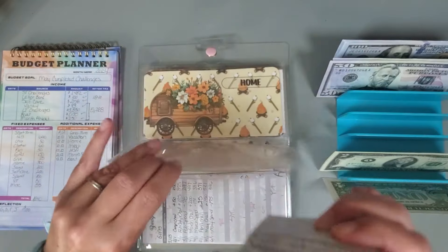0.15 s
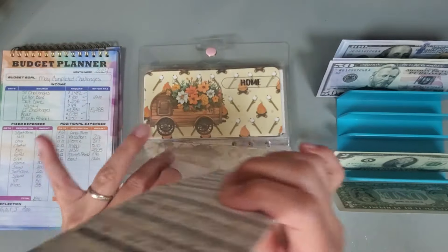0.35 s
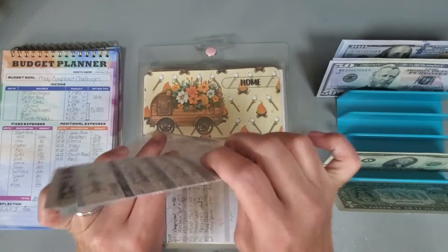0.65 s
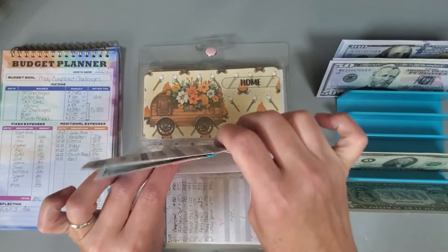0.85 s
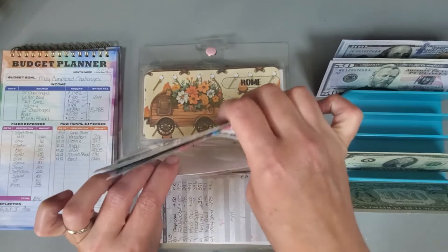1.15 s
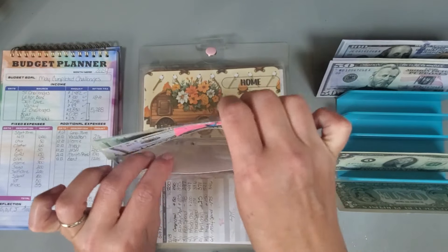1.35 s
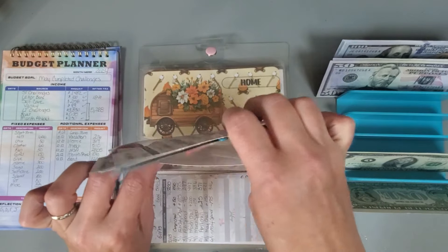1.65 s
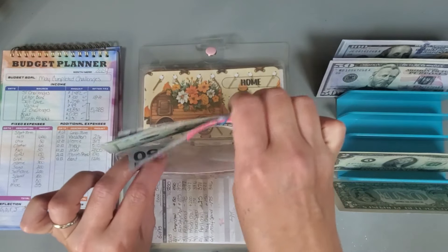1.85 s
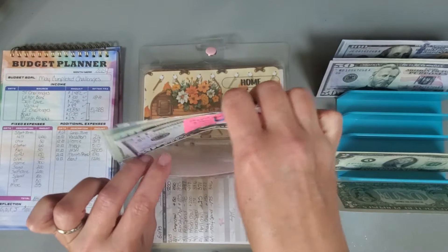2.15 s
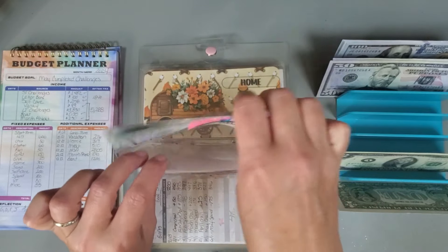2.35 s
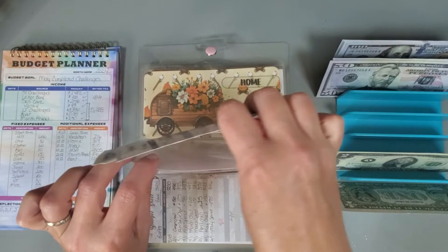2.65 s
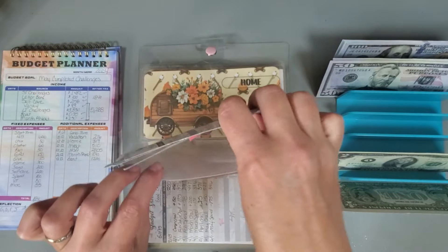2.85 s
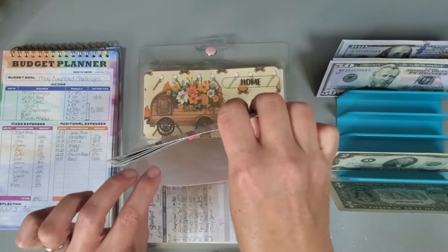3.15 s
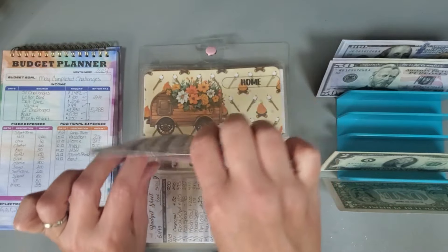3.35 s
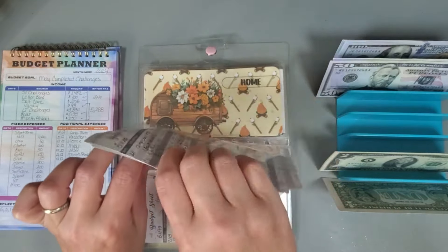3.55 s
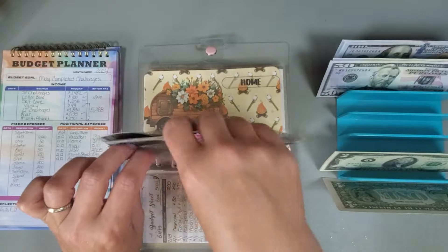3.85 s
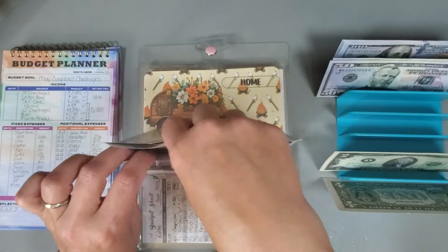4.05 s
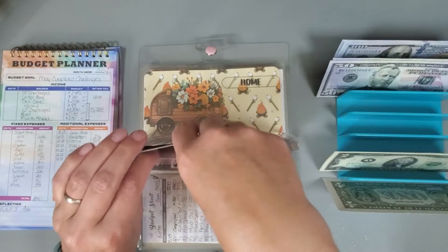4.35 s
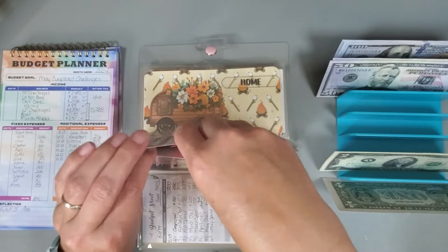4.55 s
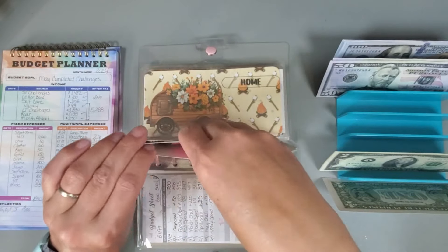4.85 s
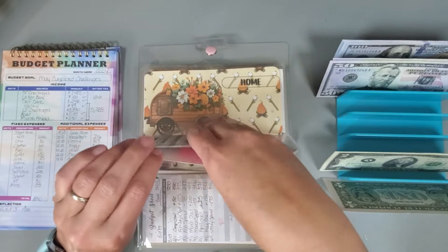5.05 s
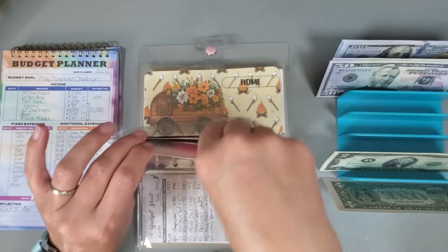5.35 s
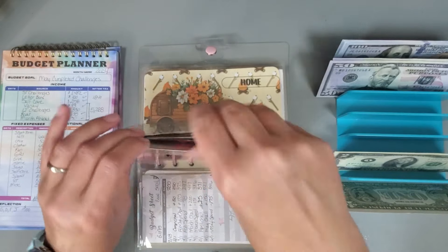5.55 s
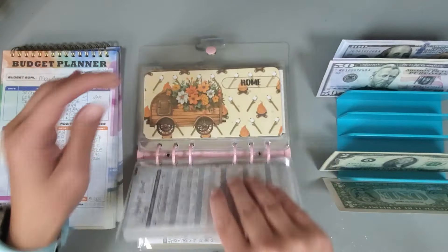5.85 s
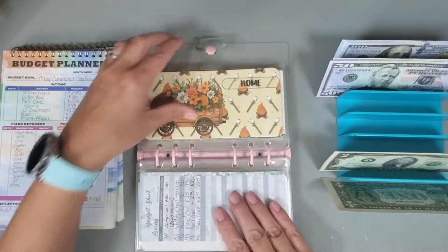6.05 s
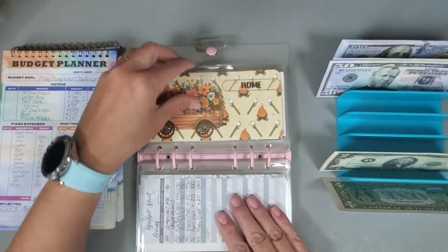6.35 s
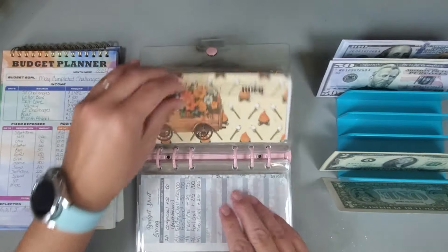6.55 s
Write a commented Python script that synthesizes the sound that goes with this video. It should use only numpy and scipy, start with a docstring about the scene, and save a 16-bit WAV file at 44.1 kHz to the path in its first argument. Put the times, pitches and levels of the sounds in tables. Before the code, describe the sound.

Paper money rubs against a plastic sleeve in short pushes, with crease snaps, thin ticks and dull knocks on a desk.

```python
"""In a quiet room, below a phone, hands start sliding a stack of banknotes into a plastic binder envelope.
Paper rubs on plastic in short pushes, creases snap, the film ticks and swishes, and knuckles bump the desk.
The sharpest snaps come near 1.8 s and 4 s; from then on the notes are inside and the rubbing loses a band
of treble. Near 5.8 s hand and binder thump the desk hardest, and a few last pushes follow. Throughout, the
hollow over the desk colours the paper's sound, the room adds a short tail and the house murmurs."""
import sys
import numpy as np
from scipy import signal
from scipy.fft import rfft, irfft, next_fast_len
from scipy.io import wavfile
from scipy.ndimage import uniform_filter1d

SR = 44100
rng = np.random.default_rng(int(sys.argv[2]) if len(sys.argv) > 2 else 0)


def store_wav(level_fs):
    """Save 16-bit WAV to argv[1]."""
    pcm = np.round(np.clip(np.atleast_2d(level_fs), -1, 1) * 32767)
    wavfile.write(sys.argv[1], SR, pcm.T.astype(np.int16))


N = 296307

STROKE_RANGE_DB = 20  # drop over one rise or fall time, before it is multiplied by the steepness
STEEPNESS = (1.69, 1.64, 1.02, 0.75)  # for hiss, fizz, scrape, weight
RESTING_DB = (-89, -84.5, -77, -92)  # the same four: resting fingers keep a faint rub going
# Pushes of paper over plastic: (peak time [s], rise [s], fall [s], hiss of the paper faces [dB],
# fizz of the edges [dB], scrape of the stack [dB], weight on the desk [dB])
PAPER_STROKES = [(0.0, .02, 0.17, -61.5, -70, -56, -53.5),
                 (0.132, 0.0079, 0.12, -49.5, -54.5, -47.5, -59.5),
                 (.22, 0.12, 0.27, -67.5, -81, -62, -63.5),
                 (0.369, 0.061, 0.069, -48.5, -58.5, -46.5, -52.5), (0.505, 0.14, 0.09, -67, -70, -53, -59),
                 (0.581, 0.097, 0.17, -49, -59, -47, -60), (0.938, 0.21, 0.11, -54.5, -65.5, -49.5, -49),
                 (1.066, 0.028, 0.094, -53, -62, -50.5, -46), (1.121, 0.036, 0.16, -46.5, -52, -45, -47.5),
                 (1.2, 0.18, 0.089, -48, -52, -52.5, -63), (1.295, 0.18, 0.11, -50, -52.5, -43, -47),
                 (1.36, 0.023, 0.2, -62, -86, -47.5, -53), (1.426, 0.019, 0.059, -55, -54.5, -48.5, -52),
                 (1.542, 0.061, 0.17, -54, -70, -46.5, -51), (1.71, 0.29, 0.71, -58, -67.5, -59, -59),
                 (1.781, 0.089, 0.087, -45.5, -53, -46.5, -55), (1.811, .005, 0.055, -34.5, -40, -46, -60),
                 (1.83, 0.043, 0.023, -35, -33, -41, -52), (1.85, .03, 0.049, -64, -53, -64, -49),
                 (1.909, 0.05, 0.26, -56.5, -64, -48, -45), (2.112, 0.12, 0.21, -49, -53.5, -41.5, -46.5),
                 (2.285, 0.03, 0.16, -44.5, -54.5, -38.5, -48), (2.43, 0.12, 0.15, -51, -55.5, -45.5, -54),
                 (2.525, 0.026, 0.075, -42, -45, -43, -47.5), (2.679, 0.01, 0.25, -54, -61, -49, -56),
                 (2.75, 0.14, 0.075, -53.5, -55, -47.5, -59), (2.94, 0.19, 0.36, -61, -72, -53.5, -53.5),
                 (3.197, 0.086, 0.12, -56.5, -63, -49.5, -58), (3.354, 0.088, 0.33, -48.5, -54, -47, -63),
                 (3.416, 0.03, 0.15, -44, -42.5, -49.5, -48.5),
                 (3.625, 0.057, 0.095, -45, -52.5, -44.5, -47),
                 (3.77, 0.32, 0.12, -43.5, -48.5, -46.5, -54), (3.54, 0.097, 0.15, -59, -58.5, -75, -67),
                 (3.85, 0.085, 0.2, -57, -72, -52, -49), (3.974, 0.012, 0.22, -45.5, -47.5, -39, -39),
                 (4.08, 0.28, 0.22, -50.5, -60, -65, -62), (4.179, 0.15, 0.22, -47.5, -58, -44.5, -44.5),
                 (4.32, 0.038, 0.052, -40.5, -40.5, -46, -49),
                 (4.454, 0.084, 0.12, -49.5, -54.5, -47.5, -54.5),
                 (4.569, 0.11, 0.094, -52.5, -63, -47.5, -53), (4.641, 0.096, 0.14, -54, -60.5, -52.5, -62),
                 (4.747, 0.11, 0.16, -47, -53, -46, -60), (4.961, 0.44, 0.28, -55, -63.5, -52, -53),
                 (5.15, 0.73, 1.7, -63, -80, -60, -71), (5.148, 0.093, 0.078, -52.5, -61.5, -48, -58),
                 (5.31, 0.17, 0.13, -50, -57, -44.5, -55), (5.424, 0.06, 0.19, -48.5, -55.5, -49.5, -50.5),
                 (5.65, 0.52, 0.2, -55, -70, -46.5, -47.5), (5.835, 0.12, 0.092, -48, -58, -45.5, -42.5),
                 (5.89, 0.0099, 0.043, -48, -53, -64, -40.5), (6.03, 0.22, 0.12, -59.5, -68, -54.5, -45.5),
                 (6.27, 0.1, 0.067, -57.5, -69, -59.5, -51), (6.12, 0.034, 0.33, -64, -76, -59, -54.5),
                 (6.471, 0.016, 0.1, -57, -67, -55.5, -80), (6.55, 0.04, 0.2, -53, -58, -51, -52),
                 (6.591, 0.066, 0.038, -53, -51, -64, -58), (6.71, 0.18, .1, -63.5, -69, -54.5, -69)]
def paper_strokes():
    """Each push swells and dies away; gives the strength of hiss, fizz, scrape and weight over time."""
    t = np.arange(0, N + 64, 64) / SR
    power = undb(2 * np.array(RESTING_DB))[:, None]
    for peak_s, rise_s, fall_s, *peak_db in PAPER_STROKES:
        away = np.maximum((peak_s - t) / rise_s, (t - peak_s) / fall_s)
        drop_db = np.outer(STEEPNESS, STROKE_RANGE_DB * away)
        power = power + undb(2 * (np.array(peak_db)[:, None] - drop_db))
    return [np.interp(np.arange(N) / SR, t, np.sqrt(p)) for p in power]


WAVER_DB, FLICKER_DB = 1.0, 1.6  # slow and fast wobble of each ringing pitch
CRINKLES_PER_S, CRINKLE_GAIN_DB = 120, 16  # small creases popping as the sheets rub
SHEEN_DB, SHEEN_PER_FIZZ = -78, 0.84  # the film's whisper at a fizz of -60 dB; dB gained per dB of fizz
# Pitches at which the envelope and the hollow over the desk ring: (pitch [Hz], width [Hz], level [dB])
HOLLOW_TONES = [(443, 53, 10), (643, 79, 11.5), (974, 109, 9), (1515, 440, -0.5), (1753, 500, 5),
                (2250, 770, 1.5), (3123, 460, 7.5), (3560, 360, 9), (3970, 620, 9), (5400, 1140, 4.5),
                (7830, 1770, -4.5), (10500, 21000, -35)]
# Pitches at which the desk top rings: (pitch [Hz], width [Hz], level [dB])
DESK_TONES = [(55, 37, 0), (90.7, 26, 3.5), (142.7, 25.6, 1), (244, 40, -3.5), (360, 83, -7.5)]
def paper_rubbing():
    """Paper sticks and slips on plastic in uneven patches, while the hand's weight shakes the desk."""
    hiss, fizz, scrape, weight = paper_strokes()
    patchy = undb(1.3 * wander(70) + 1.2 * wander(250))
    rub = 0
    for tone in HOLLOW_TONES:  # the sheets bend and shift, so each tone swells and fades by itself
        wobble = undb(WAVER_DB * wander(12) + FLICKER_DB * wander(45))
        rub = rub + wobble * ring_body(patchy * slips(N, spread_db=2.5), [tone])
    pops = (rng.random(N) < CRINKLES_PER_S / SR) * rng.standard_normal(N)
    rub = unit_level(rub) + undb(CRINKLE_GAIN_DB) * ring_body(pops, HOLLOW_TONES)
    sheen = undb(SHEEN_DB) * (fizz / undb(-60)) ** SHEEN_PER_FIZZ
    paper = scrape * unit_level(band(band(rub, 408, 1710), 404, 2140))
    paper += hiss * unit_level(band(band(rub, 2180, 6480), 1600, 6030))
    paper += fizz * unit_level(steep_band(rub, 4450, 11500))
    paper += sheen * unit_level(steep_band(rub, 10600, 19000))
    shaking = slips(N, spread_db=-0.5) * undb(2 * wander(30))
    return paper + weight * unit_level(ring_body(shaking, DESK_TONES))


INSIDE_FROM_S, DIP_DEPTH = 3.95, 0.62
def envelope_dip(rub):
    """Once the notes are inside the envelope, one band of the rubbing's treble gets weaker."""
    inside = np.clip((np.arange(N) / SR - INSIDE_FROM_S) / 0.1, 0, 1)
    return rub - DIP_DEPTH * inside * ring(rub, hz=6700, width_hz=880)


CRACK_MS, RISE_PER_FALL = 1.53, 0.16  # snaps under CRACK_MS are mostly one crack; short ones rise faster
# Creases buckling; bump, clack and crackle are relative to the tone's peak:
# (time [s], tone peak [dB], pitch [Hz], desk bump [dB], clack [dB], crackle [dB], fall [ms])
CREASE_SNAPS = [(0.124, -37, 630, -39, -11, -15, 4.2), (0.365, -45.5, 1610, -12, 2, -17, 2.6),
                (0.909, -36.5, 440, -15, -16, -15, 2.8), (1.073, -33, 397, -14, -18, -22, .5),
                (1.083, -36, 923, -28, -16, -22, 2.7), (1.123, -29, 960, -18, -13, -17, 2.8),
                (1.207, -37, 945, -10, -11, -26, 3.7), (1.221, -27, 930, -24, -40, -36, 2.4),
                (1.246, -30, 1480, -18, -21, -33, .6), (1.274, -26, 990, -37, -12, -33, 10.5),
                (1.283, -24.5, 960, -33, -9.5, -15.5, 2.1), (1.356, -38.5, 380, -25, -15, -28, 1.5),
                (1.529, -35, 1140, -26, -18.5, -29, 2.2), (1.757, -31, 780, -12, -24, -30, 1.2),
                (1.771, -31.5, 690, -25, -28, -28, 1.2), (1.809, -29, 646, -10.5, -23, -12, 0.44),
                (1.815, -22, 4080, -45, -33, -30, 0.31), (1.83, -18.5, 3500, -30, -29, -38, 2),
                (1.869, -48, 700, -20, -14, -22, 1.6), (1.888, -33.5, 504, -6.5, -19, -36, 1.7),
                (1.915, -31.5, 1680, -9, -34, -16, 2.7), (1.919, -29.5, 920, -39, -21, -17, 4.4),
                (2.015, -39, 470, -11, -15, -20, 3.9), (2.102, -32, 660, -16, -28, -28, 3.7),
                (2.118, -30.5, 990, -12.5, -14, -20, 5.1), (2.208, -31.5, 1800, -13, -13, -21, 1.6),
                (2.274, -33.5, 710, -13, -4.5, -14.5, 0.41), (2.433, -34, 1800, -26, -18, -28, 1),
                (2.499, -32.5, 960, -18, -12, -13.5, 8), (2.517, -25.5, 935, -13, -27, -17, 3.6),
                (2.53, -23, 500, -16, -14, -15.5, 2), (2.688, -31.5, 760, -40, -30, -34, 1.9),
                (2.737, -31.5, 690, -40, -13, -12.5, 0.86), (2.835, -26.5, 440, -16.5, -42, -61, 0.59),
                (2.951, -56.5, 1760, -15, 5.5, 1.5, 4.9), (3.364, -34, 980, -22, -23, -19, 1.7),
                (3.414, -35.5, 960, -26, -23, -11, 9.5), (3.614, -28.5, 880, -17.5, -11, -16.5, 3.4),
                (3.843, -36, 905, -11, -9.5, -8, 3.8), (3.9626, -15, 930, -19, -13.5, -15, 1),
                (3.964, -12.5, 644, -15, -15, -14, 2.2), (4.134, -31.5, 493, -6, -15, -37, 0.5),
                (4.165, -26.5, 707, -35, -24, -34, 0.61), (4.184, -32, 312, -7, -10, -27, 2.2),
                (4.305, -32.5, 570, -31, -39, -35, 18), (4.315, -24.5, 880, -17, -9.5, -22, 7.1),
                (4.556, -29, 710, -23, -16.5, -31, 2.5), (4.736, -28.5, 765, -11.5, -15, -30, 4.7),
                (4.84, -36, 680, -18, -47, -26, 5), (5.227, -35, 940, -35, -41, -28, 2.1),
                (5.289, -37, 643, -26, -16, -29, 5.2), (5.555, -37, 676, -12, -19, -32, 4.3),
                (5.6523, -30.5, 900, -14, -9.5, -16.5, 0.62), (5.659, -34, 1500, -19, -12, -25, 3.9),
                (5.741, -29, 800, -23, -20, -27, 0.45), (5.765, -29.5, 670, -28, -39, -45, 13),
                (5.778, -39, 450, -20, -7.5, -21, 16), (5.817, -24.5, 600, -16, -14, -22.5, 0.76),
                (5.883, -34, 580, -27, -8.5, -12, 6.1), (5.97, -31.5, 362, -9.5, -20, -24, 0.93),
                (6.014, -27, 855, -17, -15.5, -18.5, 0.4), (6.021, -30, 314, -37, -25, -21, 1.6),
                (6.042, -35.5, 930, -29, -24, -19, 2.8), (6.095, -43, 457, -23, -15, -17.5, 2.3),
                (6.105, -45, 444, -15, -6, -15, 5.2), (6.262, -39, 2720, -28, -26, -47, 5.7),
                (6.473, -54, 920, -34, 5.5, -22, 10), (6.533, -34, 1900, -28, -23, -19, 2.4),
                (6.552, -26, 2260, -25.5, -25, -21, 1.7), (6.581, -28.5, 290, -22, -9.5, -25, 2.4),
                (6.629, -34, 467, -34.5, -45, -29, 4.4)]
def crease_snaps():
    """A crease gives way in a quick run of slips: its patch rings, clacks, crackles and bumps the desk."""
    length = 4096
    out, t = np.zeros(N + length), np.arange(length) / SR
    push = np.exp(-((t - .0009) / 0.00047) ** 2)
    bump = band(ring_body(push, DESK_TONES[2:]), 180, 1200)
    fall_ms = np.array(CREASE_SNAPS)[:, -1:]
    swell = (1 - np.exp(-1000 * t / (RISE_PER_FALL * fall_ms))) ** 2
    runs = slips(length * len(CREASE_SNAPS), spread_db=2.5).reshape(-1, length)
    runs = runs * swell * np.exp(-1000 * t / fall_ms)
    runs[:, 8] += CRACK_MS / fall_ms[:, 0] * np.sqrt(np.sum(runs ** 2, axis=1))  # one sudden give
    ringing = ring_body(runs, HOLLOW_TONES)
    hollow = steep_band(ringing, 212, 1480)
    clack = steep_band(ringing, 1040, 2450)
    crackle = band(ringing, 1800, 5030) + 0.53 * band(ringing, 4900, 22000)
    for k, (time_s, db, hz, bump_db, clack_db, crackle_db, _) in enumerate(CREASE_SNAPS):
        tone = ring_twice(runs[k], hz, width_hz=.7 * hz) + 0.2 * hollow[k]
        snap = tone / np.abs(tone).max()
        for part, part_db in ((clack[k], clack_db), (crackle[k], crackle_db), (bump, bump_db)):
            strength = np.sqrt(np.sum(part ** 2) / (SR / 100))  # as if packed into 10 ms
            snap = snap + undb(part_db) * part / strength
        start = int(time_s * SR)
        out[start:start + length] += undb(db) * snap
    return out[:N]


THUMP_MS = 3.15  # rough length of one push
# Soft knocks of hand and binder: (time [s], strength of the push [dB])
DESK_THUMPS = [(1.205, -48), (1.366, -48), (2.957, -54), (5.789, -36), (5.819, -35), (5.97, -43.5),
               (6.049, -55)]
def desk_thumps():
    """Rounded pushes set the desk top humming at one of its low pitches."""
    t, force = np.arange(N) / SR, np.zeros(N)
    for time_s, db in DESK_THUMPS:
        near = slice(int((time_s - .02) * SR), int((time_s + .02) * SR))
        force[near] += undb(db) * np.exp(-(1000 * (t[near] - time_s) / THUMP_MS * np.pi) ** 2)
    hz, width_hz, _ = DESK_TONES[2]
    return 10 * ring(force, hz, width_hz)


TICK_FALL_MS = 0.64
# Thin ticks of the plastic film: (time [s], peak level [dB], pitch [Hz])
FILM_TICKS = [(.538, -55, 6000), (0.577, -37, 4330), (1.449, -44.5, 4500), (1.555, -44, 4030),
              (1.56, -43, 3500), (2.891, -45, 4280), (2.677, -50, 8100), (3.698, -47, 12000),
              (3.788, -45, 6940), (4.072, -41, 4000), (4.197, -38, 2500), (5.568, -52, 9870),
              (5.592, -50, 8000), (5.818, -54, 9000), (5.845, -48, 9000), (6.014, -40, 11000),
              (6.022, -44, 10000), (6.117, -49, 11100), (6.141, -48, 3460), (5.729, -50, 3000),
              (1.953, -36, 3970), (2.19, -54, 4350), (6.582, -43, 8950)]
def film_ticks():
    """The plastic film ticks in very short, bright bursts of noise."""
    length = 512
    out, t = np.zeros(N + length), np.arange(length) / SR
    for time_s, db, hz in FILM_TICKS:
        burst = rng.standard_normal(length) * np.exp(-1000 * t / TICK_FALL_MS)
        tick = ring_twice(burst, hz, width_hz=0.51 * hz)
        start = int(time_s * SR)
        out[start:start + length] += undb(db) * tick / np.abs(tick).max()
    return out[:N]


SWISH_RISE_S, SWISH_FALL_S = 0.0054, 0.037
# Slides that make the film hiss: (start [s], length [s], pitch [Hz], width [Hz], level [dB])
FILM_SWISHES = [(0.542, 0.092, 9400, 2600, -64), (0.584, 0.048, 7600, 1800, -62),
                (1.05, 0.18, 11500, 3000, -70), (1.51, 0.027, 8200, 2500, -66.5),
                (1.69, 0.098, 12500, 3000, -77), (1.943, .14, 12600, 2400, -79),
                (2.07, 0.093, 7500, 2000, -64), (3.324, 0.058, 12000, 3000, -67),
                (4.17, 0.14, 9000, 5000, -64.5), (4.702, 0.12, 8400, 3000, -64),
                (5.581, 0.11, 8450, 2500, -66.5)]
def film_swishes():
    """On some slides the film hisses in one narrow, high band that fades in, holds and fades out."""
    t, out = np.arange(N) / SR, 0
    noise = rng.standard_normal(N) * undb(1.6 * wander(60))
    for start_s, length_s, hz, width_hz, db in FILM_SWISHES:
        fade_in = (t - start_s) / SWISH_RISE_S
        fade_out = (start_s + length_s - t) / SWISH_FALL_S + .5
        shape = np.clip(np.minimum(fade_in, fade_out), 0, 1) ** 2
        out = out + undb(db) * shape * unit_level(ring_twice(noise, hz, width_hz))
    return out


def desk_echo(sound):
    """The echo off the desk top partly cancels one band of every sound near it."""
    return sound - .55 * ring(sound, hz=2700, width_hz=450)


ROOM_FADE_S, ROOM_DB, ROOM_TOP_HZ = 0.27, -15, 4510
def room_tail(sound):
    """The room's echoes blur into a short tail, duller than the sound itself."""
    t = np.arange(SR // 2) / SR
    tail = rng.standard_normal(len(t)) * undb(-60 * t / ROOM_FADE_S)
    tail *= 1 - np.exp(-t / 0.00073)
    tail = signal.lfilter(*signal.butter(1, ROOM_TOP_HZ, fs=SR), tail)
    tail /= np.sqrt(np.sum(tail ** 2))
    return undb(ROOM_DB) * signal.fftconvolve(sound, tail)[:N]


MURMUR_DB = -60
# The background noise, from bass to treble: (pitch [Hz], relative level [dB])
MURMUR_SHAPE = [(18, -24), (30, -4.5), (98, 3), (179, -22), (258, -14.5), (372, -30), (581, -10),
                (736, -16), (1010, -8.5), (2400, -49.5), (15800, -47.5)]
def house_murmur():
    """The house murmurs low and steady under a faint microphone hiss."""
    hz, db = np.transpose(MURMUR_SHAPE)
    size = next_fast_len(N)
    all_hz = np.arange(size // 2 + 1) * SR / size + 1
    gain = undb(np.interp(np.log(all_hz), np.log(hz), db))
    murmur = irfft(rfft(rng.standard_normal(size)) * gain, size)[:N]
    return undb(MURMUR_DB) * unit_level(murmur)


def slips(count, spread_db):
    """Noise whose samples have scattered sizes, like many tiny slips."""
    size_draw, sign_draw = rng.random((count, 2)).T
    scatter = undb(-spread_db * np.log(2 * sign_draw % 1 + 1e-9))
    return np.sqrt(-np.log(size_draw)) * np.sign(sign_draw - .5) * scatter


def wander(per_s):
    """Glides to a new random value per_s times a second."""
    hold = int(SR / per_s)
    steps = np.repeat(rng.standard_normal(N // 20), hold)[:N]
    return 1.89 * uniform_filter1d(steps, hold)


def ring(x, hz, width_hz):
    """Rings at one pitch: that pitch passes unchanged and the others are weakened."""
    return signal.lfilter(*signal.iirpeak(hz, hz / width_hz, SR), x)


def ring_twice(x, hz, width_hz):
    """Picks out one pitch more sharply."""
    return ring(ring(x, hz, width_hz), hz, width_hz)


def ring_body(x, tones):
    """Rings at several pitches; neighbours get opposite signs to keep the gaps between them shallow."""
    return sum((-1) ** k * undb(db) * ring(x, hz, width) for k, (hz, width, db) in enumerate(tones))


def band(x, low_hz, high_hz):
    """Keeps what lies between two pitches."""
    return signal.sosfilt(signal.butter(2, [low_hz, high_hz], "band", fs=SR, output="sos"), x)


def steep_band(x, low_hz, high_hz):
    """A band with sharper edges."""
    return band(band(x, low_hz, high_hz), low_hz, high_hz)


def undb(db):
    """Turns decibels into a number to multiply by."""
    return 10 ** (np.asarray(db) / 20)


def unit_level(x):
    """Scales a sound to an average power of 1."""
    return x / np.sqrt(np.mean(x ** 2))


def scene():
    """Adds up the sounds at the desk, then the room around them, in one channel."""
    near = envelope_dip(paper_rubbing()) + film_swishes() + crease_snaps() + film_ticks() + desk_thumps()
    near = desk_echo(near)
    return (near + room_tail(near) + house_murmur())[None]


BASS_CUT_HZ, TREBLE_CUT_HZ = 35, 15900
def record(dry):
    """The phone drops the deepest bass and the highest treble."""
    dry = signal.lfilter(*signal.butter(2, BASS_CUT_HZ, "high", fs=SR), dry)
    return signal.sosfilt(signal.ellip(10, .2, 70, TREBLE_CUT_HZ, fs=SR, output="sos"), dry)


dry = scene()
out = record(dry)
store_wav(out)
```